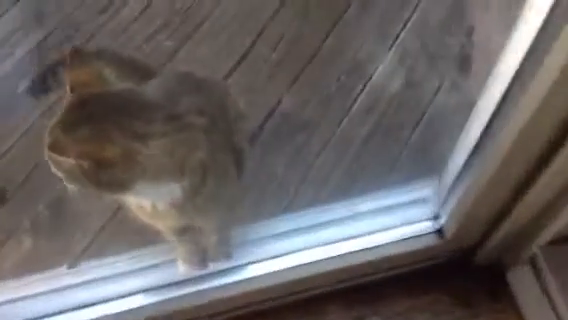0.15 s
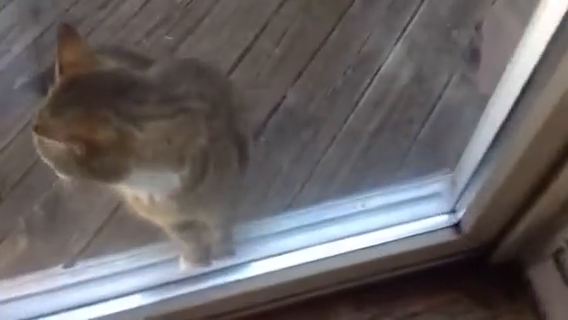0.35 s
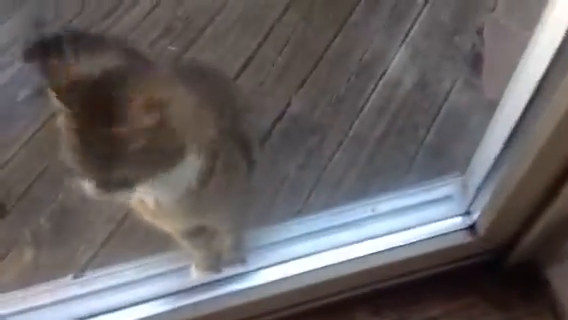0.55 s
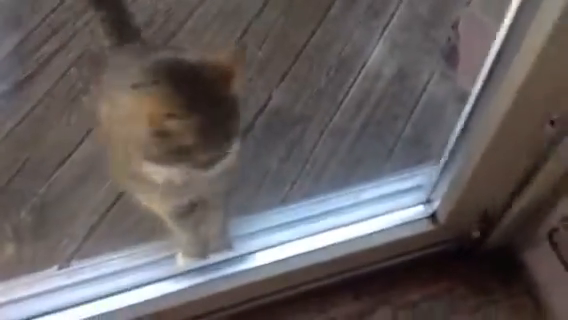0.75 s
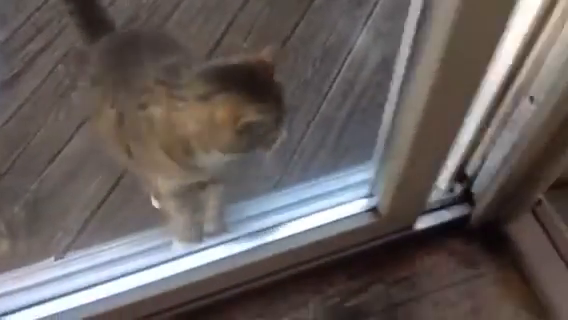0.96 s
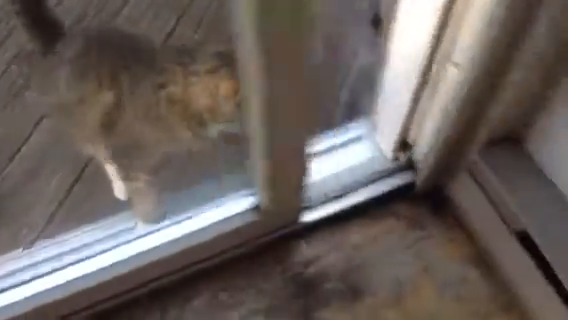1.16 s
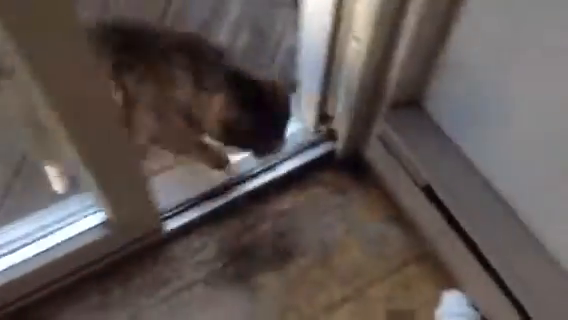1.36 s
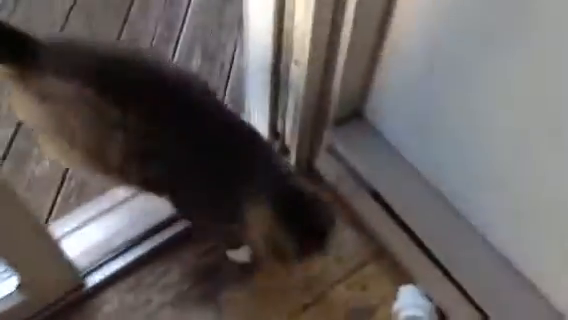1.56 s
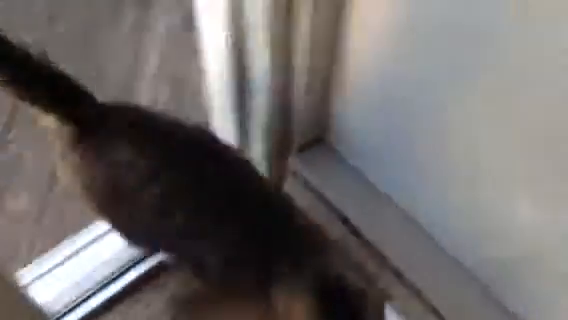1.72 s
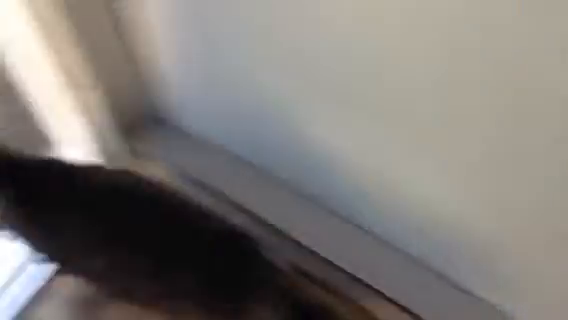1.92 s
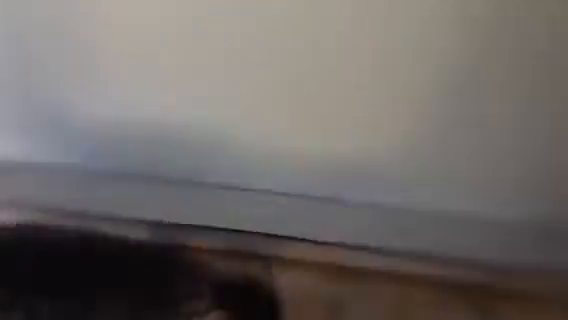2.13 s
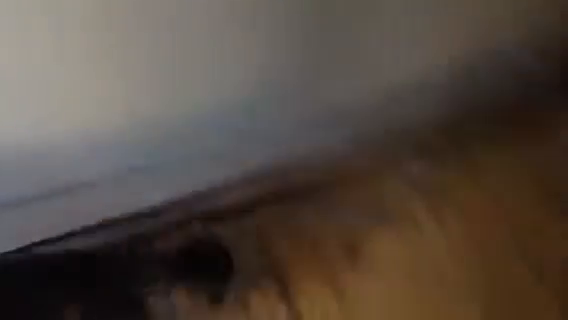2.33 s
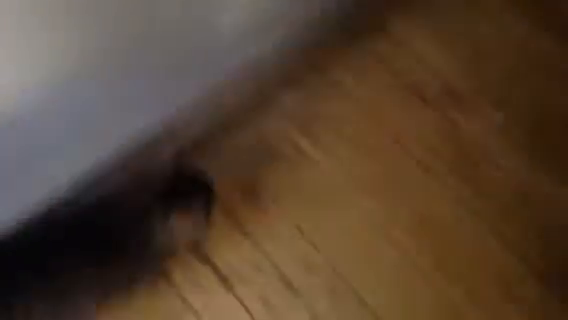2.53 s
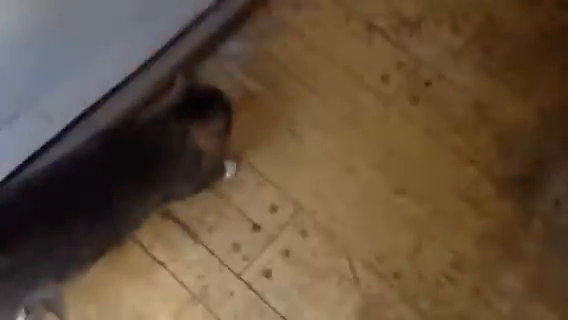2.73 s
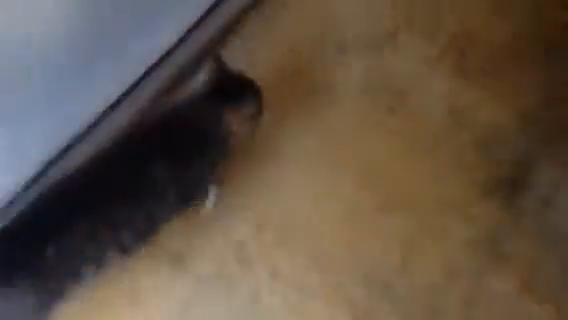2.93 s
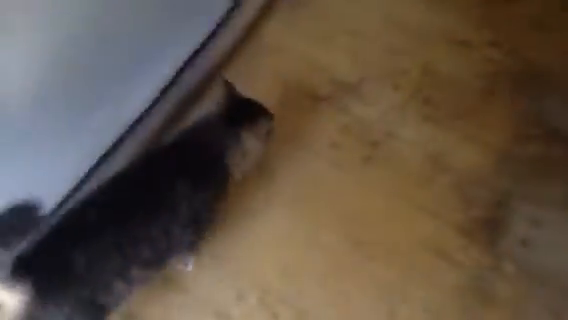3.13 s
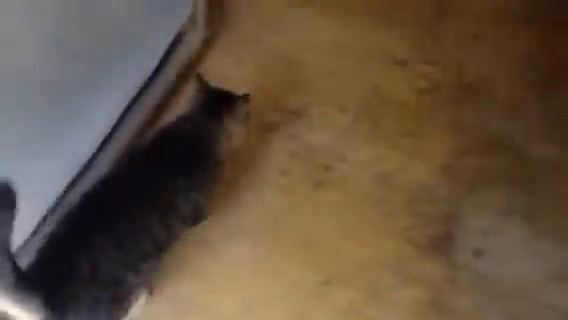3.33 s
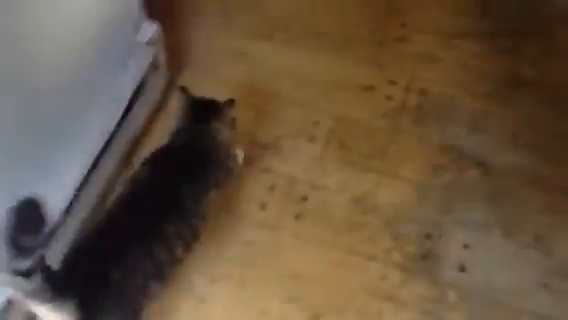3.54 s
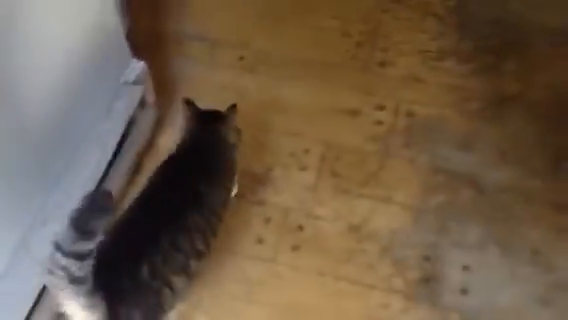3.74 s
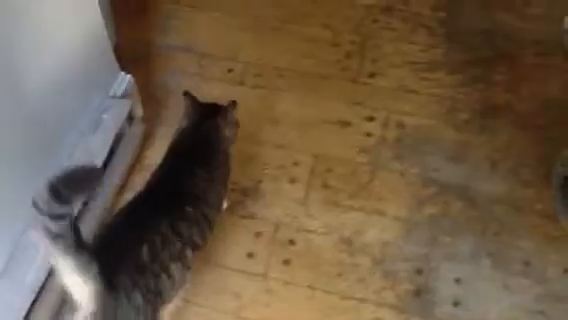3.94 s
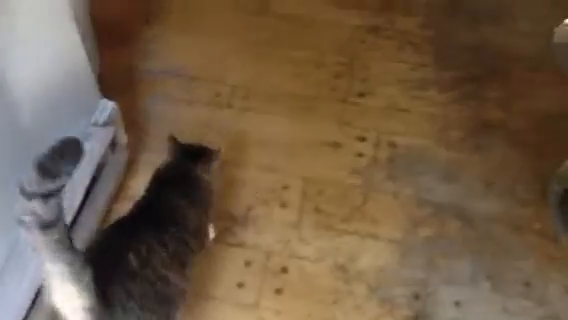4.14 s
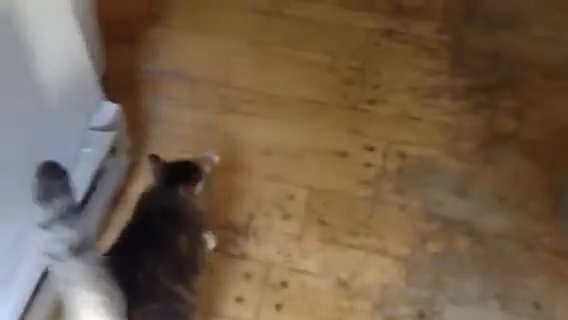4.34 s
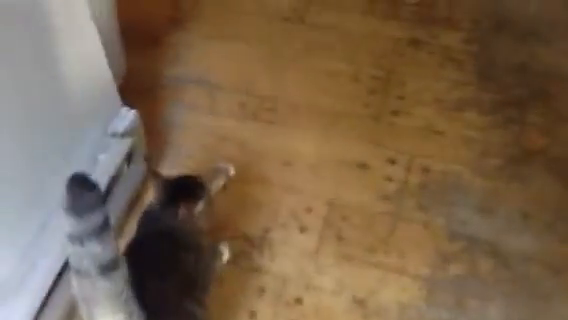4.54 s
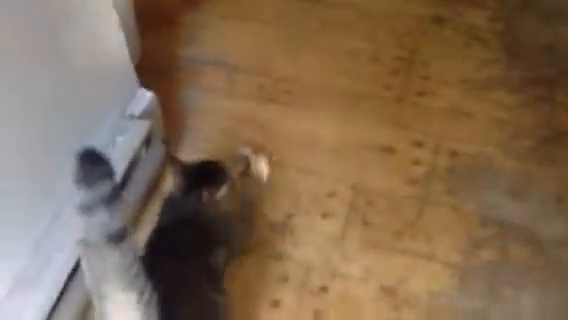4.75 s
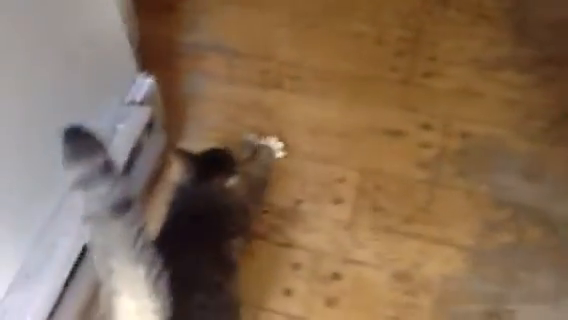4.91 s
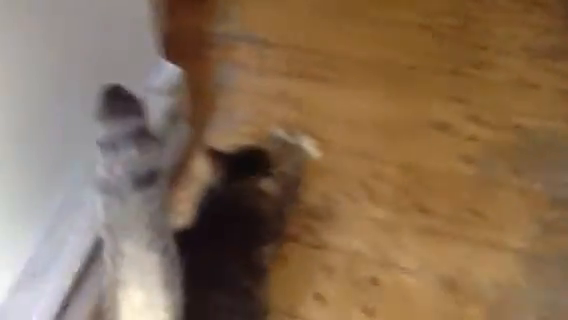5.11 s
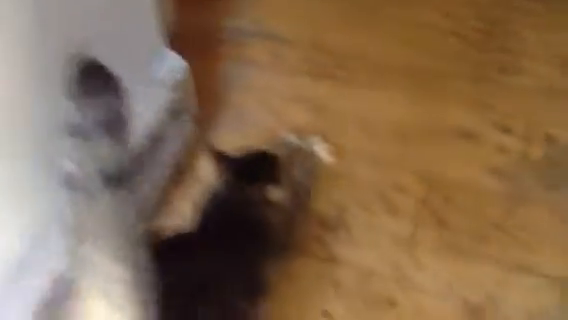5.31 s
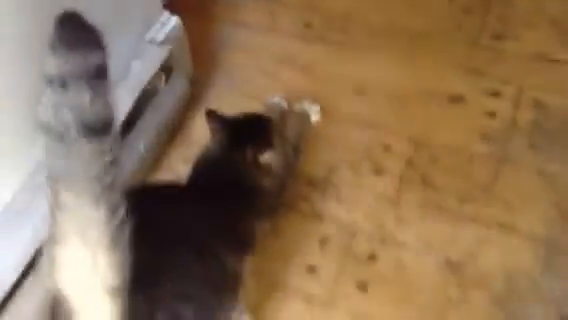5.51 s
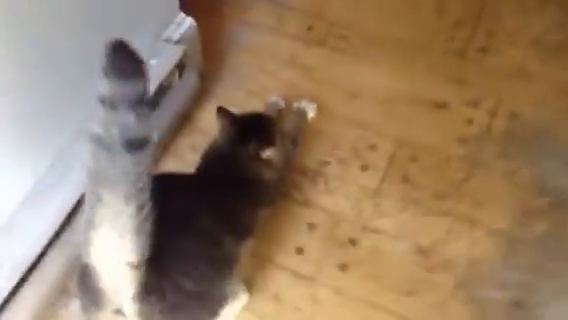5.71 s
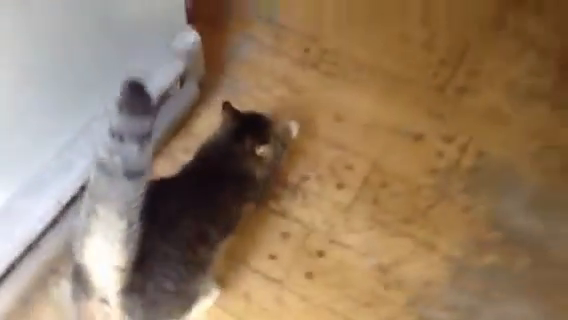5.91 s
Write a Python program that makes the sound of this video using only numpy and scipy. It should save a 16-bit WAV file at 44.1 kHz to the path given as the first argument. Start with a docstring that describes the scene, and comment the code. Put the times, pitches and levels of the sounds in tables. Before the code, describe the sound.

A quiet house hum runs throughout in a small, slightly reverberant room. Faint scuffs and a few close plastic ticks open the scene. At about 0.6 seconds a latch clatters in a quick cluster of sharp clicks, the loudest moment, and a door seal tears loose with a hiss. From 0.8 seconds a sliding glass door rumbles grittily along its track, squealing briefly, swelling around 1.4 and stopping with a knock at 1.8. From 2 seconds on, slippers scuff, squeak and tap on a wooden floor, with clearer steps near 2.4, 3 and 4.5. Around 3.9 a cat gives one short, soft chirp that rises and falls, while something hollow is briefly dragged. Small dry pops come at 4.9 and 5.2, and a last tap at 5.9. Throughout, the plastic case of a hand-held phone ticks irregularly, close and dry.

```python
"""A latch clicks, a seal tears loose and a sliding glass door rumbles along its track, its rollers
crushing grit that excites the resonances of panel and frame. Slippers scuff and squeal by stick-slip
friction and tap on a wooden floor; a cat walks in and chirps once, a short harmonic hum, while something
hollow is dragged. These sounds reverberate in a small room. Close by, the plastic case of a hand-held
phone ticks in the grip, over the quiet hum of a house."""
import sys
import numpy as np
from scipy import signal
from scipy.fft import rfft, irfft, next_fast_len
from scipy.io import wavfile
from scipy.ndimage import uniform_filter1d

SR = 44100
rng = np.random.default_rng(int(sys.argv[2]) if len(sys.argv) > 2 else 0)


def dump_mix(stems):
    """Bounce the given channels to the path in sys.argv[1] as a 16-bit WAV at rate SR."""
    frames = np.atleast_2d(stems).T  # one column per channel
    limited = np.clip(frames, -1, 1)  # hard clip at full scale
    pcm = np.round(limited * 32767).astype(np.int16)
    wavfile.write(sys.argv[1], SR, pcm)


N = 263277
TIME = np.arange(N) / SR


def undb(db):
    """Amplitude ratio of a level in decibels."""
    return 10 ** (np.asarray(db) / 20)


def unit(x):
    """Normalisation to an RMS of 1."""
    return x / np.sqrt(np.mean(x ** 2))


def band(x, hz, width_hz, order=1):
    """Band-pass resonance: a higher order is steeper and builds up more slowly."""
    low = np.sqrt(hz ** 2 + width_hz ** 2 / 4) - width_hz / 2
    edges = [low, min(low + width_hz, .45 * SR)]
    return signal.sosfilt(signal.butter(order, edges, "band", fs=SR, output="sos"), x)


def ring(x, modes, order=1):
    """Modal superposition: a body responds as a sum of resonances, here of alternating sign."""
    return sum((-1) ** k * undb(db) * band(x, hz, width, order) / np.sqrt(width)
               for k, (hz, width, db) in enumerate(modes))


def swaying_ring(x, modes, sway_db, rate_hz):
    """Modal superposition in which each resonance swells and sinks independently; RMS 1."""
    return unit(sum((-1) ** k * undb(sway_db * walk(rate_hz)) * ring(x, [mode])
                    for k, mode in enumerate(modes)))


def colour(x, shape):
    """Spectral shaping by a curve of (Hz, dB) points; RMS 1."""
    size = next_fast_len(N)
    hz = np.maximum(np.arange(size // 2 + 1) * SR / size, 1)
    points_hz, db = np.transpose(shape)
    gain = undb(np.interp(np.log(hz), np.log(points_hz), db))
    return unit(irfft(rfft(x, size) * gain, size)[:N])


def walk(rate_hz):
    """Smoothed random fluctuation of RMS 1."""
    hold = int(SR / rate_hz)
    steps = np.repeat(rng.standard_normal(N // hold + 1), hold)
    return unit(uniform_filter1d(uniform_filter1d(steps, hold), hold)[:N])


def grit(per_second, spread_db):
    """Friction as shot noise: tiny slips at random times and of uneven size."""
    slips = (rng.random(N) < per_second / SR) * rng.standard_normal(N)
    return unit(slips * undb(spread_db * rng.exponential(size=N)))


def stroke(start, swell, hold, fade, swell_db=14, fade_db=25):
    """Exponential envelope: rises by swell_db, holds, then falls by fade_db in each fade time."""
    t = TIME - start
    rise_db = swell_db * np.minimum(t / max(swell, .001) - 1, 0)
    fall_db = fade_db * np.maximum(t - swell - hold, 0) / max(fade, .005)
    return undb(rise_db - fall_db) * np.clip(t / .0022, 0, 1)


# Modes of the glass panel and of its frame. Each row: frequency in Hz, bandwidth in Hz, gain in dB.
PANEL_MODES = [(354, 49, -6.5), (471, 55, -0.5), (593, 167, 2.5), (708, 126, 1.5), (852, 150, -3.5),
               (1400, 740, -6), (2000, 190, -14.5), (2790, 270, -20)]
FRAME_MODES = [(102, 34, -18), (136, 75, -14), (174.7, 45, 0.5), (230.5, 54, 0)]
def door():
    """Forced vibration: crushed grit drives panel and frame; the panel modes sway as the rollers move."""
    crush = grit(2500, 1.17) * undb(.7 * walk(60.17))
    panel = swaying_ring(crush, PANEL_MODES, sway_db=1.5, rate_hz=11.9)
    frame = unit(ring(crush, FRAME_MODES, order=2))
    thump = undb(2) * unit(band(crush, 131, 87, order=2))  # the whole frame shakes at each jerk
    return rolling(panel, frame) + tearing_seal(panel, frame + thump)


# The door's travel. Each row: time in seconds, rumble level in dB, brush hiss level in dB.
TRAVEL = [(.76, -65, -65), (.79, -52, -43.5), (.87, -47.5, -41.5), (.94, -47, -44), (.955, -40, -45),
          (1.06, -37.5, -45), (1.12, -34.5, -42.5), (1.19, -32.5, -42), (1.27, -32.5, -41.5),
          (1.35, -30.5, -40.5), (1.42, -31, -42), (1.48, -33.5, -37.5), (1.56, -37.5, -42),
          (1.62, -40.5, -44.5), (1.69, -47, -50), (1.77, -54.5, -58), (1.83, -55, -59)]
# Spectrum of the brush seal. Each row: frequency in Hz, relative spectral density in dB.
BRUSH_SPECTRUM = [(1500, 1), (3000, -3.5), (7500, -8), (9500, -8.5), (11500, -7.5), (15000, -12.5)]
def rolling(panel, frame, frame_db=-8.5):
    """Rolling noise and sliding friction: the door rumbles unevenly while its brush seal hisses."""
    hiss = colour(grit(9000, .7), [(500, -30), *BRUSH_SPECTRUM]) * undb(.57 * walk(57.9))
    times, *levels = np.transpose(TRAVEL)
    rumble_gain, hiss_gain = (undb(np.interp(TIME, times, db, left=-100, right=-100)) for db in levels)
    rumble = undb(.7 * walk(25.1)) * (panel + undb(frame_db) * frame)
    return rumble_gain * rumble + hiss_gain * hiss


# Jerks of the seal. Each row: start, swell, hold and fade in seconds, panel level in dB,
# then hiss, frame boom and crunch in dB relative to the panel.
JERKS = [(0.573, .006, .03, .03, -48, 1.5, -17, -1.5), (.61, 0.012, 0.041, .03, -40.5, 3, -16, -5),
         (0.64, 0.022, 0.022, 0.058, -35, 6, -3.5, -3), (0.704, 0.022, 0.0039, 0.048, -40.5, 8.5, 3.5, 4),
         (0.756, 0.0082, 0.008, 0.052, -37.5, -3, -6, -3.5), (.785, .02, 0.042, 0.099, -53, -2, -1, 8)]
# Spectrum of the tearing seal. Each row: frequency in Hz, relative spectral density in dB.
SEAL_SPECTRUM = [(500, -30), (1500, -0.5), (3000, -4), (7500, -7), (10000, -8), (12500, -5), (15000, -6.5)]
def tearing_seal(panel, frame):
    """Stick-slip release: the seal lets go in jerks that hiss, crunch and shake the door."""
    crunch = unit(band(grit(1800, 2.1), 1900, 2000, order=2))
    hiss = colour(grit(9000, 1.), SEAL_SPECTRUM)
    out = 0
    for *timing, db, hiss_db, boom_db, crunch_db in JERKS:
        jerk = panel + undb(boom_db) * frame + undb(hiss_db) * hiss + undb(crunch_db) * crunch
        out += undb(db) * stroke(*timing) * jerk
    return out


# Blows of latch, frame, heels and claws. Each row: start in seconds, peak of the rap in dB,
# thud and snap in dB relative to it, pitch of the rap in Hz.
IMPACTS = [(.066, -50, -20, 10, 4500), (.172, -48, -20, 12, 4700), (0.1994, -36.5, 5.5, -30, 1870),
           (0.572, -33, -4, 6, 1060), (0.5904, -32.5, 0.5, -3, 1640), (.614, -26.5, -23, 6, 1520),
           (.6182, -26.5, 3.5, 5, 1760), (0.6254, -20, -22, -16, 1450), (0.6375, -18.5, -20, -5, 1900),
           (0.65, -23, 2, 7, 1010), (0.6585, -21.5, -4, 7, 1300), (0.6669, -24, 0, 12.5, 2790),
           (.6695, -24, 3, 13, 2640), (.6785, -22, 2.5, 10, 780), (0.723, -23, -22, -6, 1600),
           (.7555, -24.5, -18, 3, 4030), (0.7575, -16, -3, -9, 1550), (.8483, -39, -19, -5, 912),
           (.9505, -26, -19, -7, 780), (1.83, -28, -7, -2, 780), (1.8365, -32.5, -1, -8, 680),
           (1.8653, -27.5, -5, -22, 1300), (2.0885, -39, -4, 5, 1760), (2.1224, -43, -12, 2, 1300),
           (2.163, -43, -14, 4, 1460), (2.2012, -38.5, -5, 4, 1480), (2.2359, -37.5, -6, -1, 1480),
           (2.308, -37, -11, -12, 1400), (2.391, -39, -6, -10, 800), (2.3986, -25, -6.5, -5, 1010),
           (2.408, -34, -4, -14, 900), (2.4182, -32.5, -1, -13, 1000), (2.431, -34, -4, -10, 1600),
           (2.443, -25.5, -7, -13, 1010), (2.4477, -30, 2.5, -12, 890), (2.474, -36, 4, -14, 1500),
           (2.66, -42, -9, -17, 1720), (2.8436, -38, 2, 5, 2050), (3.018, -29, -5.5, -5, 1110),
           (3.0224, -31, -2.5, -12, 1800), (3.03, -35, 0, -15, 1680), (3.043, -37, 1, -15, 2000),
           (3.775, -38, -15, 0, 2950), (4.4515, -24.5, -28, -5, 1780), (4.4527, -25, -7, -5, 694),
           (4.6126, -41, -14, -4, 1154), (4.6417, -29.5, -14.5, 11.5, 1630), (4.7962, -46, 2.5, -12, 1800),
           (4.8965, -41.5, -3, 5, 3900), (4.9135, -39, -1, -12, 2700), (4.924, -42.5, 2, -15, 1400),
           (5.0117, -42.5, -3, -2, 1790), (5.048, -48, -12, 9, 2000), (5.419, -36, -12, 3, 3340),
           (5.5028, -48, -15, 3, 3200), (5.5484, -44, -10, -9, 2800), (5.558, -44, -19, -17, 2700),
           (5.9056, -28, -24, -8, 2240), (5.909, -27.5, -30, -3, 5280)]
# Modes of the wood's thud. Each row: frequency in Hz, bandwidth in Hz, gain in dB.
WOOD_MODES = [(251, 196, -2.5), (403, 244, -2.5), (740, 330, -2.5)]
# Modes of the hard parts' rap. Each row: frequency and bandwidth as multiples of the pitch, gain in dB.
HARD_MODES = [(1, 0.4, 9), (1.9, 1.0, -1.5)]
def impacts(contact_weight=7, rattle_rise_s=.0015, rattle_t60_s=.036):
    """Impact excitation: a contact and a dying rattle ring the wood low and the hard parts higher."""
    size = 9000
    out, t = np.zeros(N + size), TIME[:size]
    rattle_gain = np.exp(-np.log(1000) * t / rattle_t60_s) * (1 - np.exp(-t / rattle_rise_s))
    for start, db, thud_db, snap_db, hz in IMPACTS:
        force = contact_weight * (t == 0) + rattle_gain * rng.standard_normal(size)
        hard_modes = [(ratio * hz, width * hz, mode_db) for ratio, width, mode_db in HARD_MODES]
        rap = ring(force, hard_modes, order=2)
        thud = ring(force, WOOD_MODES, order=2)
        snap = band(force, 7130, 11000, order=2)
        rap, thud, snap = (part / np.abs(part).max() for part in (rap, thud, snap))
        i = int(start * SR)
        out[i:i + size] += undb(db) * (rap + undb(thud_db) * thud + undb(snap_db) * snap)
    return out[:N]


# Rubs of soles, cloth and fur. Each row: start, swell, hold and fade in seconds, level in dB,
# bass and treble in relative dB, delay of the wall reflection in milliseconds.
RUBS = [(0, 0.0029, 0.065, 0.12, -52.5, -3, 1.5, .5), (0.072, 0.08, 0.12, 0.067, -49, -1, -4, 0.4),
        (0.235, 0.13, 0.081, 0.029, -50, -3.5, 4, 0.37), (0.494, 0.021, 0.068, .02, -55.5, 0, -13, 0.37),
        (1.863, .01, .02, 0.11, -52.5, 0.5, -18, 0.38), (1.927, 0.012, 0.045, 0.29, -46, -4.5, -11, 0.49),
        (2.018, 0.0067, 0.15, 0.037, -59, -0.5, -10, 0.66),
        (2.192, 0.0091, 0.021, 0.088, -49.5, -3, -14, 0.85),
        (2.295, 0.0074, 0.019, 0.29, -50, -5, -20, 1.1), (2.393, 0.0055, 0.067, 0.27, -45, -2, -12.5, 1.17),
        (2.646, 0.16, 0.019, 0.026, -58, -4, -1.5, 0.94),
        (2.836, 0.0087, 0.027, 0.1, -54.5, -3.5, -23, 0.98),
        (2.952, 0.011, 0.052, 0.014, -46.5, -9, -19, 0.66),
        (3.016, 0.005, 0.045, 0.11, -44.5, -4, -30, 0.58), (3.274, .01, 0.037, .1, -62.5, -4, 5, 0.69),
        (3.487, 0.0045, 0.077, 0.075, -48, -3.5, -18, 1.1),
        (3.795, 0.053, 0.22, 0.098, -51, -13, -7.5, 1.75), (4.163, 0.018, 0.14, 0.11, -61, -2.5, 2, 1.4),
        (4.387, 0.012, 0.058, .02, -45, -6, -14, 1.5), (4.457, 0.01, .01, 0.16, -43, -5, -14, 1.73),
        (4.572, 0.026, 0.069, .03, -61, 0, -8, 1.6), (4.641, 0.0089, .005, 0.15, -47.5, -15, -3.5, 1.1),
        (4.9, 0.0085, 0.0086, 0.073, -55.5, 6.5, -25, 1.1), (4.988, .12, .01, 0.061, -59, 5, -11, 1.4),
        (5.243, 0.0095, 0.0075, 0.052, -58, 2, -8, 1.7), (5.415, .008, .005, 0.1, -55.5, -2, -7, 1.8),
        (5.488, 0.068, .005, .05, -54.5, -6, -15, 1.3), (5.819, .02, 0.058, .03, -60.5, -10, -3, 1.5),
        (5.894, 0.014, .01, 0.14, -51, -15, -6, 1.4)]
def scuffs(reflection=.074):
    """Sliding friction: dense slips, their lower part comb-filtered by a weak reflection off the wall."""
    slips = grit(8000, 1.) * undb(1.25 * walk(50))
    bass = unit(band(slips, 468, 1270, order=2))
    middle = unit(band(slips, 1770, 2290))
    treble = unit(band(slips, 6340, 14800, order=2))
    out = 0
    for *timing, db, bass_db, treble_db, delay_ms in RUBS:
        rub = middle + undb(bass_db) * bass
        echo = reflection * np.roll(rub, int(delay_ms * SR / 1000))
        out += undb(db) * stroke(*timing) * (rub + echo + undb(treble_db) * treble)
    return out


# Squeals of rubber and soles. Each row: start and end in seconds, first and last pitch in Hz, level in dB.
SQUEAL_GLIDES = [(0.098, 0.215, 1600, 1600, -54), (.815, 0.847, 950, 904, -41),
                 (.948, 1.055, 827, 740, -44), (1.936, 1.957, 3100, 2200, -47),
                 (1.949, 1.968, 2250, 1900, -45), (1.97, 1.988, 2100, 1700, -51),
                 (2.953, 3.011, 1485, 2350, -46.5), (2.965, 3., 2640, 2950, -55),
                 (2.975, 3.014, 3700, 4340, -54.5), (3.407, 3.445, 4100, 4670, -67),
                 (3.44, 3.49, 4700, 4350, -68), (3.488, 3.513, 1330, 890, -55),
                 (3.492, 3.536, 2700, 2970, -55), (4.388, 4.43, 1900, 1560, -50),
                 (4.411, 4.452, 1950, 1800, -50), (4.392, 4.439, 3000, 2600, -58),
                 (4.395, 4.45, 5500, 5450, -61), (4.39, 4.429, 1260, 995, -54),
                 (4.391, 4.445, 637, 464, -52.5), (4.47, 4.558, 1900, 1720, -56),
                 (4.4, 4.452, 4400, 3900, -58), (5.548, 5.58, 4600, 4600, -64),
                 (5.55, 5.58, 5500, 5400, -66)]
def squeals():
    """Stick-slip oscillation: gliding tones whose slips are too uneven for a pure pitch."""
    out = np.zeros(N)
    waver, flutter = .04 * walk(700), undb(3 * walk(300))
    for start, end, first_hz, last_hz, db in SQUEAL_GLIDES:
        i, j = int(start * SR), int(end * SR)
        hz = np.geomspace(first_hz, last_hz, j - i) * (1 + waver[i:j])
        envelope = undb(db) * signal.windows.tukey(j - i, .5) * flutter[i:j]
        out[i:j] += envelope * np.sqrt(2) * np.sin(2 * np.pi * np.cumsum(hz) / SR)
    return out


# Contour of the cat's chirp. Each row: time in seconds, pitch in Hz, level in dB.
CHIRP_CONTOUR = [(3.895, 320, -62), (3.915, 335, -46), (3.932, 350, -49), (3.95, 460, -49),
                 (3.99, 475, -47), (4.02, 430, -49), (4.045, 380, -60)]
# The cat's timbre. Each entry: relative level in dB, for harmonics 1 to 4.
HARMONICS_DB = [0, -7, -9, -10]
def cat():
    """Voicing with the mouth closed: an arched harmonic hum, made hoarse by jitter and shimmer."""
    times, hz, db = np.transpose(CHIRP_CONTOUR)
    pitch = np.interp(TIME, times, hz) * (1 + .02 * walk(200))
    phase = 2 * np.pi * np.cumsum(pitch) / SR
    hum = sum(undb(harmonic_db + 3 * walk(90)) * np.sin(k * phase)
              for k, harmonic_db in enumerate(HARMONICS_DB, 1))
    return undb(np.interp(TIME, times, db, left=-120, right=-120)) * hum


# The dragging gesture. One row: start, swell, hold and fade in seconds, level in dB.
DRAG_STROKE = (3.8, 0.04, 0.24, 0.05, -48.5)
# Modes of the hollow body. Each row: frequency in Hz, bandwidth in Hz, gain in dB.
HOLLOW_MODES = [(377, 88, -3.5), (980, 60, -8), (1110, 70, -7), (1410, 120, -6), (1870, 70, -6.5),
                (2530, 90, -7.5), (3000, 240, -4.5), (3940, 150, -8.5), (4440, 200, -10), (5330, 200, -8.5),
                (6100, 200, -10), (7800, 600, -9.5), (9500, 300, -13)]
def hollow_drag():
    """Friction-driven resonance: raspy slips ring the modes of a hollow body."""
    *timing, db = DRAG_STROKE
    body = swaying_ring(grit(4000, 2.), HOLLOW_MODES, sway_db=2.5, rate_hz=25)
    return undb(db) * stroke(*timing) * body


# Slips of the phone case. Each row: start in seconds, main mode's peak in dB, low mode in relative dB.
CASE_SLIPS = [(0.1192, -35, -3), (0.1795, -34, -6), (0.2185, -23, -11), (0.2684, -22.5, -9.5),
              (0.5009, -23, -10), (1.7482, -37, -16), (2.0332, -31, -14), (2.287, -26, -11.5),
              (2.6775, -42, -16), (2.891, -41, -13), (3.4175, -33, -13), (3.752, -25.5, -12),
              (4.318, -30.5, -12.5), (5.0856, -40, -13), (5.0931, -41, -16), (5.1047, -44, -14),
              (5.1177, -44, -16), (5.1535, -31.5, -12), (5.5995, -44, -16), (5.6124, -40, -20),
              (5.7543, -29, -14), (5.772, -38, -16), (5.787, -40, -13), (5.796, -39, -12),
              (5.8047, -41, -12), (5.8265, -45, -14)]
# Main, low and bright modes of the plastic. Each row: frequency in Hz, bandwidth in Hz, gain in dB.
CASE_MODES = [(2070, 920, 0), (800, 390, 0), (5800, 3100, -17)]
def case_ticks():
    """Impulse response: each slip rings the damped plastic modes; the narrowest builds up last."""
    size = 600
    responses = [band(signal.unit_impulse(size), hz, width, order=3) for hz, width, _ in CASE_MODES]
    main, low, bright = (undb(db) * response / np.abs(response).max()
                         for response, (*_, db) in zip(responses, CASE_MODES))
    out = np.zeros(N + size)
    for start, db, low_db in CASE_SLIPS:
        i = int(start * SR)
        out[i:i + size] += undb(db) * (main + bright - undb(low_db) * low)
    return out[:N]


# Dry pops. Each row: start in seconds, level in dB, first and last pitch in Hz,
# glide time constant and 60 dB decay time in seconds, snap gain in relative dB.
POPS = [(4.8966, -30, 1650, 950, .003, .02, -8), (4.9102, -27.5, 1500, 1300, .001, .011, -10),
        (5.2313, -25, 3300, 250, .00075, .025, 6)]
def pops(rise_s=.0005):
    """Dispersion: a bending wave's high frequencies arrive first, so each pop snaps and glides down."""
    out = 0
    for start, db, first_hz, last_hz, glide_s, t60_s, snap_db in POPS:
        t = np.maximum(TIME - start, 0)
        cycles = last_hz * t + (first_hz - last_hz) * glide_s * (1 - np.exp(-t / glide_s))
        envelope = (1 - np.exp(-t / rise_s)) * np.exp(-np.log(1000) * t / t60_s)
        impulse = 1. * (np.diff(t > 0, prepend=0) > 0)
        snap = undb(snap_db) * band(impulse, 6300, 990, order=2)
        out += undb(db) * (envelope * np.sin(2 * np.pi * cycles) + snap)
    return out


# A thin swish during the drag. One row: start, swell, hold and fade in seconds, level in dB.
SWISH_STROKE = (3.8, .2, .35, .08, -64)
# Its band. One row: first centre, last centre and width, all in Hz.
SWISH_BAND = (9000, 11100, 3000)
def swish():
    """Amplitude modulation: noise on a rising carrier makes a narrow hiss whose centre climbs."""
    *timing, db = SWISH_STROKE
    first_hz, last_hz, width_hz = SWISH_BAND
    hz = np.interp(TIME, [timing[0], sum(timing)], [first_hz, last_hz])
    carrier = np.sqrt(2) * np.sin(2 * np.pi * np.cumsum(hz) / SR)
    return undb(db) * stroke(*timing) * walk(width_hz) * carrier


def room(x, t60_s=.37, level_db=-12.5, cutoff_hz=5500):
    """Reverberation: many reflections merge into a dull, exponentially decaying tail."""
    t = TIME[:SR // 2]
    tail = rng.standard_normal(len(t)) * np.exp(-np.log(1000) * t / t60_s) * (t > .005)
    tail = signal.lfilter(*signal.butter(1, cutoff_hz, fs=SR), tail)
    return undb(level_db) * signal.fftconvolve(x, tail / np.sqrt(np.sum(tail ** 2)))[:N]


# Spectrum of the house's hum and hiss. Each row: frequency in Hz, relative spectral density in dB.
HOUSE_SPECTRUM = [(41, -46), (70, -35), (132, -2), (254, 0), (547, -10), (899, -10.5), (1050, -12),
                  (1770, -14), (1940, -17.5), (2720, -20), (7870, -23.5), (10100, -23), (15500, -29)]
def house(level_db=-54.5):
    """Ambient noise: a broad steady spectrum whose level wanders by about a decibel."""
    return undb(level_db + walk(6.06)) * colour(rng.standard_normal(N), HOUSE_SPECTRUM)


def scene():
    """Superposition: distant sources excite the room; the case, at the microphone, is heard dry."""
    far = door() + scuffs() + hollow_drag() + swish() + squeals() + impacts() + cat()
    return (far + room(far) + case_ticks() + pops() + house())[None]


def record(dry, bottom_hz=100, top_hz=15350):
    """Band limiting: the phone thins the bass, adds its amplifier's faint murmur and cuts the top."""
    thin = signal.sosfilt(signal.butter(4, bottom_hz, "high", fs=SR, output="sos"), dry)
    murmur = undb(-81.5) * unit(band(rng.standard_normal(N), 62, 40))
    return signal.sosfilt(signal.ellip(12, .2, 60, top_hz, fs=SR, output="sos"), thin + murmur)


dry = scene()
out = record(dry)
dump_mix(out)
```